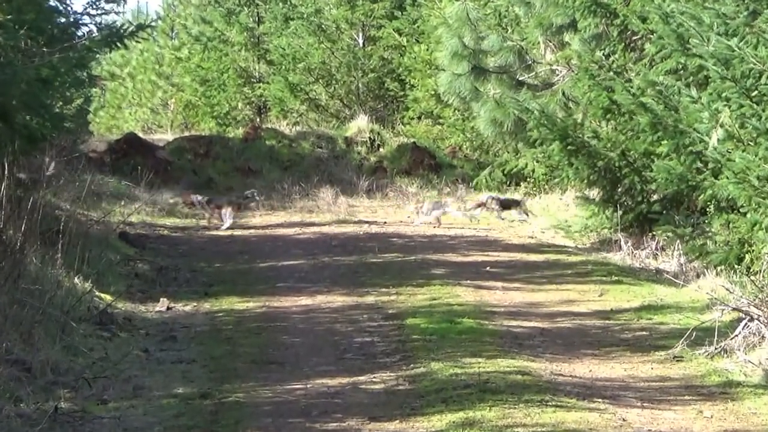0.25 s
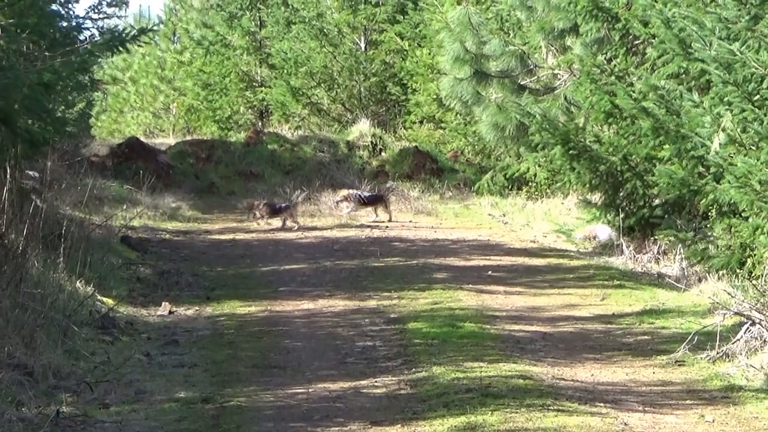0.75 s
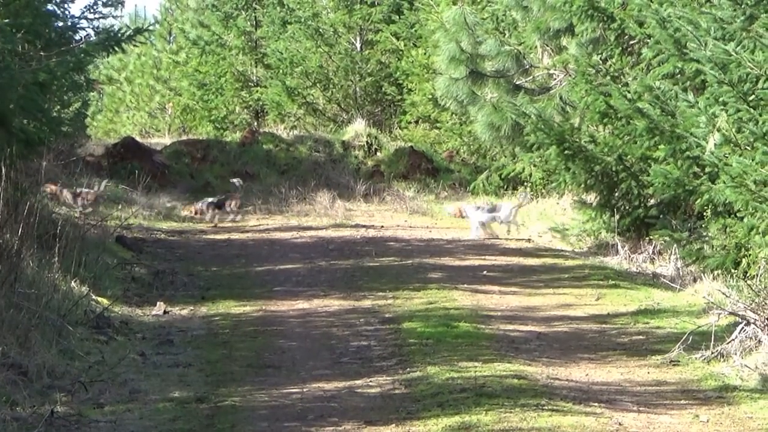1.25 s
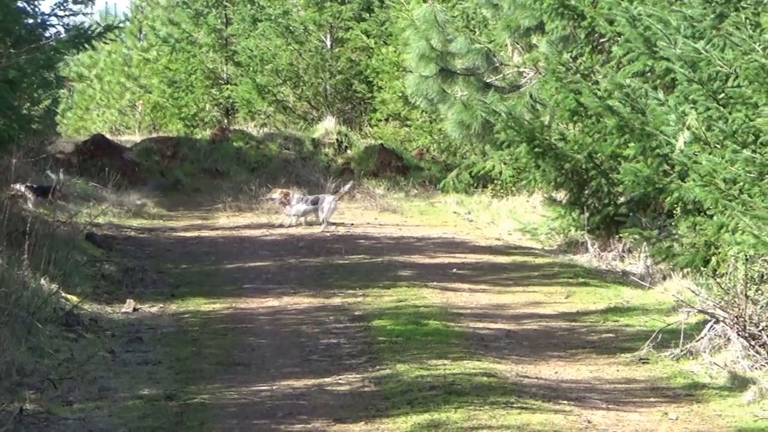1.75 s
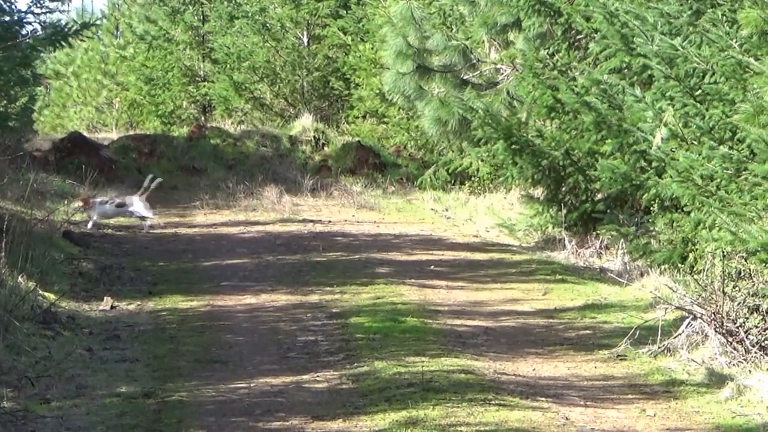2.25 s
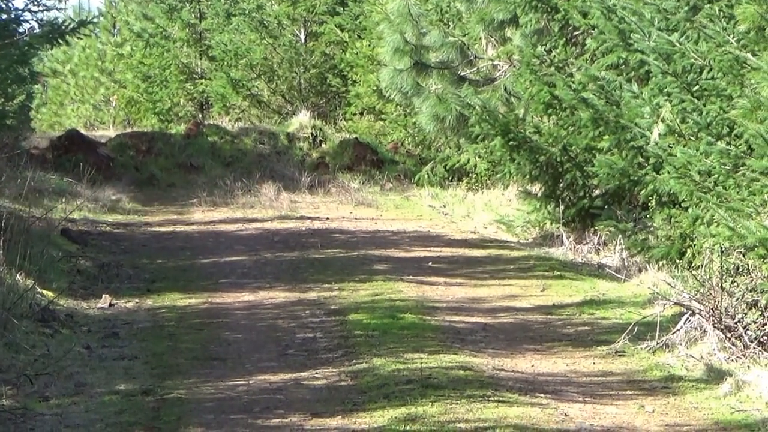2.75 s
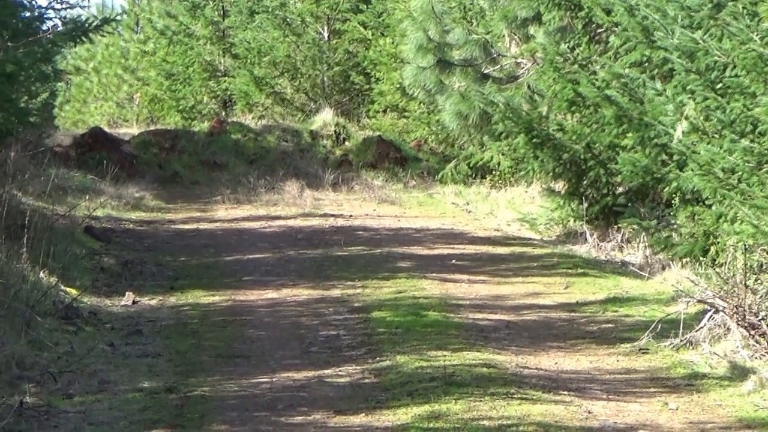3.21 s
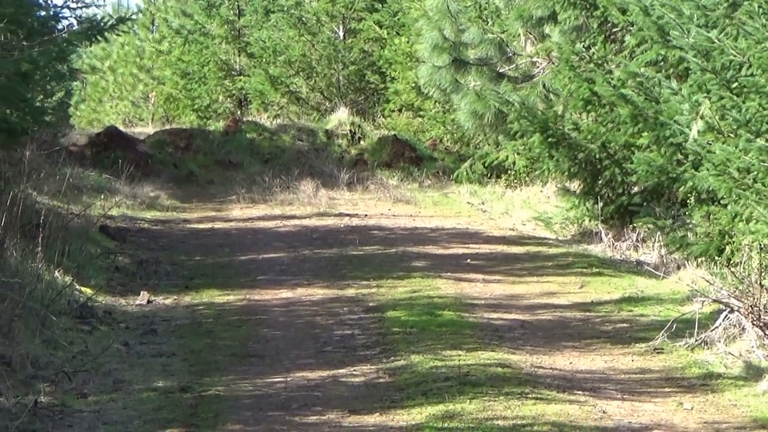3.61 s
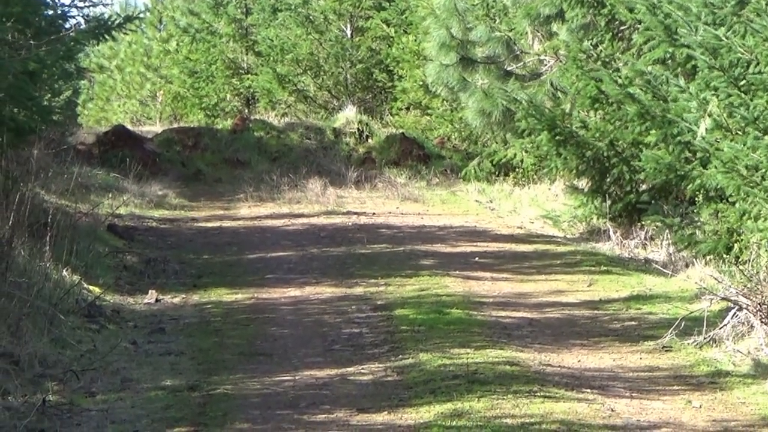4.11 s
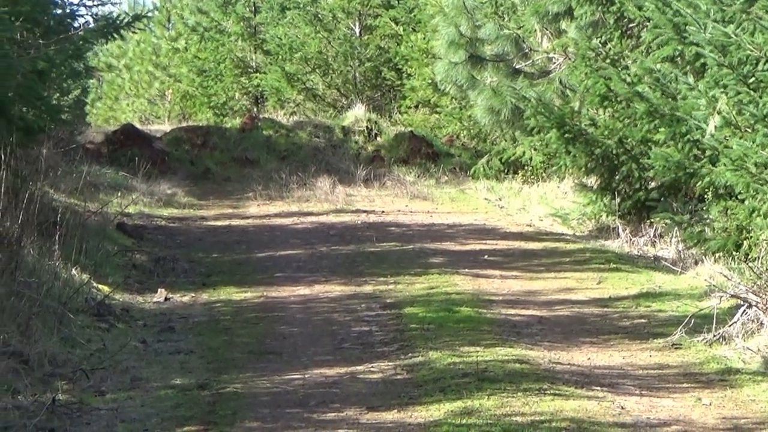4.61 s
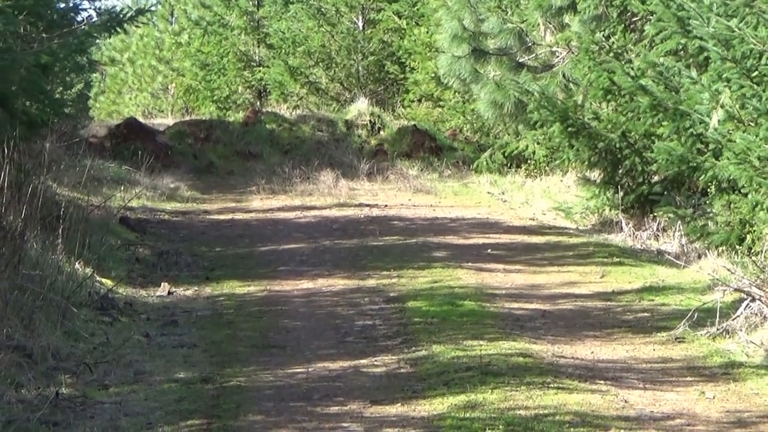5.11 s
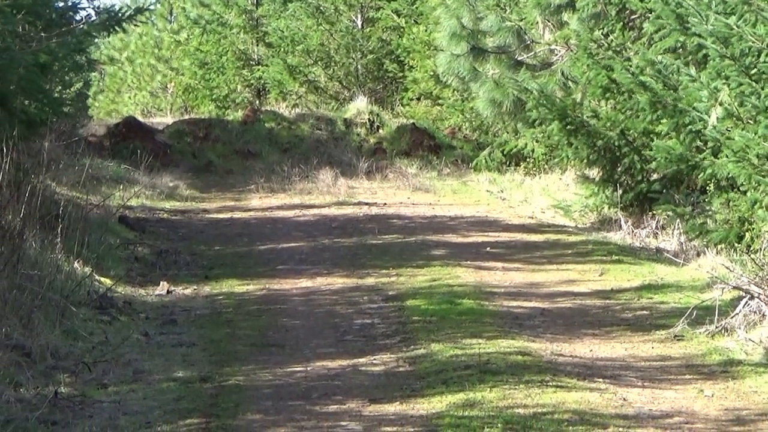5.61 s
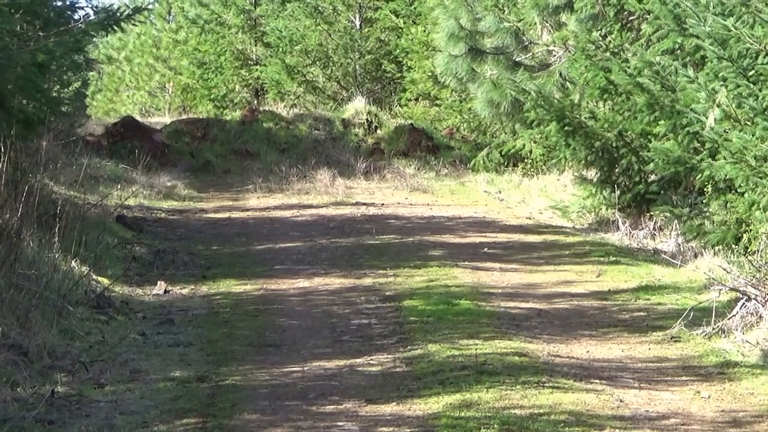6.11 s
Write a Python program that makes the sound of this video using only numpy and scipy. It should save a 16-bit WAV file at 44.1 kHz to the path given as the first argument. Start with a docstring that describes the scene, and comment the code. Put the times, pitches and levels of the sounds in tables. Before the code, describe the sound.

Hounds bay loudly close by, then the hoarse chorus of the pack carries on further off, echoing through a quiet forest.

```python
"""A few loud hound bays close by, then the hoarse chorus of the pack further off in a forest.
Each bay is a buzzing throat heard through a mouth that opens and closes. High yelps and thin howls
ring over the rest, a deep dog calls below, and twigs snap under paws. The trunks scatter every voice
into a long echo over quiet air and a faint hum. A small camera with two close microphones
holds the loudest bays down."""
import sys
import numpy as np
from scipy import signal
from scipy.fft import rfft, irfft, next_fast_len
from scipy.io import wavfile
from scipy.ndimage import uniform_filter1d, minimum_filter1d, map_coordinates

SR = 44100
rng = np.random.default_rng(int(sys.argv[2]) if len(sys.argv) > 2 else 0)


def waveform_to_disk(signal):
    """Save audio, clipped to [-1, 1], as 16-bit WAV at the path in sys.argv[1]."""
    frames = np.transpose(np.atleast_2d(signal))
    scaled = np.clip(frames, -1, 1) * 32767
    samples = np.round(scaled).astype(np.int16)
    wavfile.write(sys.argv[1], SR, samples)


N = 280476

# The close bays. Each row: start, time open and time closed in seconds, mouth ring when open and when
# closed in Hz, starting offset in dB, low overtones when open and when closed in dB, high overtones in dB,
# rise time in seconds, hiss in dB, second mouth ring in Hz, hoarseness from 0 to 1.
CLOSE_BAYS = [(-.185, 0.067, 0.097, 1000, 620, -17, -13, -13, -18.5, 0.013, -38, 2340, 0.06),
              (.1, 0.057, 0.087, 1097, 730, -16.5, -17, -13.5, -24.5, 0.02, -50, 2740, 0.24),
              (.392, 0.033, 0.052, 614, 625, -10.5, -24, -20, -31, 0.023, -56.5, 1740, 0.7),
              (.783, .062, 0.07, 1183, 890, -12.5, -7, -15, -19, .015, -46.5, 2640, 0.04),
              (1.32, 0.061, 0.098, 990, 663, -11, -12, -12, -25, .026, -49.5, 1900, 0.25)]
# The tune of each close bay, one list per bay. Each point: time in seconds, pitch in Hz.
CLOSE_TUNES = [
    [(0, 316), (.05, 287)],
    [(.1, 341.7), (.117, 361.2), (.135, 315), (.158, 322.3), (.175, 357.4), (.27, 345.5), (.31, 335)],
    [(.39, 310.3), (.5, 305.7), (.54, 297)],
    [(.783, 370.3), (.798, 380.3), (.803, 322), (.82, 336.6), (.845, 313.2), (.853, 373), (.89, 357),
     (.92, 329.8), (.945, 389), (.975, 342)],
    [(1.32, 349.4), (1.343, 299.1), (1.37, 276.2), (1.388, 286.5), (1.405, 326.6), (1.45, 302.3),
     (1.5, 292.2), (1.54, 249)],
]
# The tone of a close bay's high overtones. Each row: frequency in Hz, level in dB.
CLOSE_BRIGHTNESS = [(1300, -1), (1700, 3.5), (2100, -2.5), (2700, -7), (3100, -25), (3600, -30),
                    (6000, -78.5)]
# The breath in a close throat. Each row: frequency in Hz, level in dB.
CLOSE_HISS = [(3000, -48.5), (4600, -15), (5800, -8.5), (7100, 0.5), (9900, -6), (12100, -20),
              (14000, -29.5)]
# The hoarse middle of a hound's voice, close or far. Each row: frequency in Hz, level in dB.
RASP = [(300, -45), (800, -6), (1200, -6.5), (1500, -18), (2000, -26.5), (4000, -94.5)]
def close_bay(row, tune):
    """Throat pulses sound through a mouth that closes, so the strongest overtone steps down."""
    onset_s, hoarseness = row[9], row[12]
    start, fades, (mouth_hz, second_hz, low_db, high_db, hiss_db) = curves(*mouth_motion(*row[:-1]), .005)
    size = len(fades)
    hz = np.interp((start + np.arange(size)) / SR, *np.transpose(tune))
    gape = np.clip((mouth_hz - 620) / 300, 0, 1)
    rough = .015 + hoarseness * gape ** 2  # a wide mouth is hoarser
    phase = 2 * np.pi * np.cumsum(hz * (1 + (.003 + .4 * rough ** 2) * wobble(90, size))) / SR

    def overtone(k, noisy_share, width_hz):
        return np.sin(k * phase + rng.uniform(0, 2 * np.pi)) * roughen(noisy_share, width_hz, size)

    def brightness(f):
        return amp(along(CLOSE_BRIGHTNESS, f)) * (.51 + resonance(f, second_hz, width_hz=910))

    # The mouth rings narrowly at first, so one overtone leads.
    ring_width_hz = mouth_hz * np.interp(np.arange(size) / SR, [onset_s, onset_s + BRIGHTEN_S], [.35, .55])
    weights = np.array([resonance(k * hz, mouth_hz, ring_width_hz) ** 2 for k in range(2, 5)])
    low = np.sum(weights * [overtone(k, rough / 2, 300) for k in range(2, 5)], 0)
    low *= np.sqrt(2 / np.sum(weights ** 2, 0))
    odd_db, high_rough = -6, min(.16 + 1.5 * hoarseness, .9)  # uneven pulses: odd overtones are fainter
    high = unit(sum(brightness(k * hz) * amp(odd_db * (k % 2) + 3.5 * np.tanh(wobble(40, size)))
                    * overtone(k, high_rough, 400) for k in range(5, 12)))
    rasp = (amp(high_db - 4) + amp(low_db - 20)) * patchy(noise(RASP, size), depth_db=4)
    puffs = 1 + .7 * np.cos(phase)  # air leaves in one puff each cycle
    hiss = patchy(puffs * noise(CLOSE_HISS, size), depth_db=6.5)
    voice = amp(low_db) * low + rasp + amp(high_db) * high + amp(hiss_db) * hiss
    return place(fades * voice, start)


BRIGHTEN_S = .0072  # the high overtones reach full strength this long after the rise
def mouth_motion(s, open_s, closed_s, open_hz, closed_hz, onset_db, open_db, low_db, high_db,
                 onset_s, hiss_db, second_hz):
    """A bay rises, brightens, strains wide open, closes, holds and lets go: its times, rings and levels."""
    close_s, release_s, release_db = .015, .049, -30.5
    strain_s = max(open_s - onset_s - BRIGHTEN_S, 1e-3)
    times = s + np.cumsum([0, onset_s, BRIGHTEN_S, strain_s, close_s, closed_s, release_s])
    mouth = [open_hz] * 2 + [.98 * open_hz] * 2 + [closed_hz, .93 * closed_hz, 1.53 * closed_hz]
    second = second_hz * np.array([1, 1, 1, .935, .87, .72, .72])
    low = [open_db + onset_db, open_db, open_db - 2, low_db - 1, low_db, low_db, low_db + release_db]
    high = high_db + np.array([2 * onset_db, -2, 0, 0, -3.5, -3.5, -3.5 + release_db / 2])
    hiss = hiss_db + np.array([onset_db, onset_db / 2, onset_db / 4, 0, 0, 0, release_db])
    shut_s = np.maximum(times - times[4], 0)  # once the mouth shuts, high overtones and hiss die away
    return times, [mouth, second, low, high - 130 * shut_s, hiss - 96.5 * shut_s]


def groan(row, tune):
    """The throat's lowest note sounds briefly and sinks as a close bay lets go."""
    length_s, sinks_to, level_db = .065, .62, row[7] - 35.5
    times, _ = mouth_motion(*row[:-1])
    progress = np.arange(round(length_s * SR)) / (length_s * SR)
    hz = tune[-1][1] * sinks_to ** progress * (1 + .061 * wobble(74, len(progress)))
    voice = amp(level_db) * np.sin(np.pi * progress) * np.sin(2 * np.pi * np.cumsum(hz) / SR)
    return place(voice, round(max(times[-2], 0) * SR))


# The pack's far bays. Each row: start, swell and hold in seconds, main note and last note in Hz,
# then the levels of the note, the hoarse middle, the hoarse top and the hiss in dB.
FAR_BAYS = [(0, 0.01, 0.058, 629, 608, -50, -31, -41.5, -67),
            (0.303, 0.015, 0.03, 697, 696.5, -29, -59, -43.5, -59.5),
            (0.49, 0.032, 0.028, 607, 618.6, -34.5, -37.5, -38, -56.5),
            (0.979, 0.13, 0.097, 626, 672, -32.5, -35, -44, -63.5),
            (1.596, 0.013, 0.13, 620.7, 672, -33, -34.5, -41.5, -75),
            (1.791, 0.038, 0.036, 701.5, 703.6, -36, -36.5, -41, -59),
            (2.166, 0.012, 0.12, 638, 553.7, -26, -33.5, -44, -82),
            (2.337, 0.032, 0.11, 655, 623.6, -31, -38, -44, -76),
            (2.432, 0.092, 0.054, 665.3, 663, -40, -36, -44.5, -63),
            (2.769, 0.015, 0.1, 599.3, 551.3, -34, -33, -45, -78),
            (2.921, .1, 0.11, 654, 620, -27, -28.5, -37, -52.5),
            (3.344, 0.0097, 0.11, 627, 596.6, -35.5, -29.5, -29, -57),
            (3.494, 0.016, 0.22, 678.6, 613.8, -28, -32.5, -32.5, -55.5),
            (3.863, 0.0088, .13, 614, 565, -27, -31.5, -44, -61),
            (4.041, 0.016, 0.083, 792, 679.6, -26.5, -30, -33.5, -58),
            (4.173, 0.083, 0.072, 624, 592, -28, -31.5, -38, -56.5),
            (4.301, 0.039, 0.061, 713.3, 690.5, -20, -32.5, -30, -53.5),
            (4.475, 0.062, 0.13, 619.4, 588, -26.5, -29.5, -38, -63.5),
            (4.599, 0.0065, 0.028, 686, 698, -24, -39.5, -47, -81),
            (4.766, 0.026, 0.16, 694.3, 659, -25.5, -28.5, -33.5, -59),
            (5.132, 0.056, 0.035, 624, 631, -25, -31, -41.5, -65),
            (5.227, 0.026, 0.069, 731.5, 695, -22.5, -26.5, -32.5, -60),
            (5.395, 0.015, 0.061, 769, 702.6, -20, -26.5, -36, -63),
            (5.492, 0.0295, 0.15, 614.4, 568.7, -30.5, -33, -45, -64.5),
            (5.674, 0.056, 0.085, 659.6, 689.3, -24.5, -31.5, -33.5, -60.5),
            (5.888, 0.025, 0.085, 642, 650, -29.5, -32.5, -46, -68),
            (6.058, 0.012, 0.04, 765.4, 688.4, -24.5, -29.5, -29, -67),
            (6.15, 0.053, 0.12, 623.5, 581.7, -27, -32, -47.5, -66)]
# The hoarse top of a far voice. Each row: frequency in Hz, level in dB.
FAR_BRIGHTNESS = [(700, -68.5), (1500, -4.5), (2070, -5.5), (2630, -11), (3030, -16.5), (3430, -27.5),
                  (7000, -95)]
# The breath in the far throats. Each row: frequency in Hz, level in dB.
FAR_HISS = [(2500, -45.5), (3500, -3), (4400, -4.5), (5700, -5.5), (7000, -6.5), (9500, -12), (11500, -19),
            (14000, -54)]
def far_bay(s, swell_s, hold_s, hz, last_hz, note_db, middle_db, top_db, hiss_db):
    """One clear note leads, and the hoarse overtones and breath of the throats swell in behind it."""
    times, pitch = far_tune(s, swell_s, hold_s, hz, last_hz)
    levels = [far_levels(note_db), far_levels(middle_db, -3, -4.5),
              far_levels(top_db, -3, -8), far_levels(hiss_db, -10, 1.5)]
    start, fades, (hz, note_db, middle_db, top_db, hiss_db) = curves(times, [pitch] + levels, .014)
    size = len(hz)
    buzz = np.sqrt(.62) * throat_buzz(hz)
    breath = lambda tone, depth_db: np.sqrt(.38) * .5 * patchy(noise(tone, size), depth_db)
    rasp = lambda tone: unit(filtered(buzz, lambda f: amp(along(tone, f))) + breath(tone, 5))
    hoarse = amp(middle_db) * rasp(RASP) + amp(top_db) * rasp(FAR_BRIGHTNESS)
    hoarse += amp(hiss_db) * unit(breath(FAR_HISS, 4))
    swell = 1 - np.exp(-np.arange(size) / (.02 * SR))
    voice = amp(note_db) * far_note(hz, rough=.12, width_hz=70) + hoarse * swell
    return place(fades * voice, start)


def far_tune(s, swell_s, hold_s, hz, last_hz):
    """Times and pitches of a far bay: it slides up to its note, drifts, then lets go."""
    scoop, release_s = .94, .08
    return s + np.cumsum([0, swell_s, hold_s, release_s]), [scoop * hz, hz, last_hz, last_hz]


def far_levels(db, start_db=-9.5, held_db=-3.5):
    """A far bay's level at its start, after the swell, after the hold and at its end."""
    return db + np.array([start_db, 0, held_db, held_db - 21])


def far_note(hz, rough, width_hz):
    """The one strong tone of a far throat, wavering and a little noisy."""
    phase = 2 * np.pi * np.cumsum(hz * (1 + .015 * wobble(69.5, len(hz)))) / SR
    return np.sqrt(2) * np.sin(phase) * roughen(rough, width_hz, len(hz))


def throat_buzz(hz):
    """Wavering overtones of a far throat, which pulses an octave below its main note."""
    phase = np.pi * np.cumsum(hz * (1 + .006 * wobble(60, len(hz)))) / SR
    return unit(sum(amp(3.5 * wobble(35, len(hz))) * np.sin(k * phase + rng.uniform(0, 2 * np.pi))
                    for k in range(3, 11)))


# High yelps and thin howls, plus one ringing overtone of a close bay. Each row: start and length in
# seconds, the glide's first and last pitch in Hz, levels of the lowest, second and upper tones in dB.
HIGH_CALLS = [(0.265, 0.042, 1051, 1161, -20.5, -38.5, -44.5), (1.067, 0.19, 1356, 1313, -40.5, -40, -67),
              (1.784, 0.072, 1536, 1207, -31.5, -40, -40.5), (1.835, 0.2, 1260, 1184, -35.5, -41.5, -59),
              (2.049, 0.027, 1013, 980, -44, -36, -39.5), (2.138, 0.098, 1336, 1376, -34.5, -35.5, -84),
              (2.264, 0.067, 897, 1024, -32, -25, -65), (2.285, 0.062, 878, 823, -27, -29, -59),
              (2.465, 0.082, 996, 1270, -47, -42, -63), (2.732, 0.07, 1250, 1260, -29, -30, -60),
              (2.968, 0.0327, 1333, 1117, -26, -26, -47), (3.026, 0.161, 1267, 1206, -26.5, -50, -49),
              (3.477, 0.13, 1290, 1160, -26, -47, -57), (3.832, 0.107, 1232, 1229, -30, -41, -62),
              (4.047, 0.117, 1204, 1170, -50, -32, -78), (4.227, 0.035, 1483, 1428, -21, -44, -68),
              (4.287, 0.093, 1530, 1426, -69, -28, -52), (4.499, 0.093, 1040, 1283, -25, -56, -67),
              (4.755, 0.09, 1286, 1290, -56, -31.5, -69), (4.851, 0.053, 1334, 1298, -25, -21.5, -48),
              (5.111, 0.139, 1380, 1350, -30, -49, -74), (5.211, 0.13, 1252, 1299, -34, -34, -72),
              (5.686, 0.065, 1376, 1370, -30, -26.5, -52), (5.843, 0.11, 1579, 1133, -27.5, -39.5, -46.5),
              (6.139, 0.084, 1276, 1338, -29, -39, -69), (6.326, 0.087, 1390, 1330, -27, -32.5, -79),
              (0.212, 0.054, 1344, 1398, -28.5, -61, -68), (2.497, 0.22, 1245, 1121, -36, -44, -56),
              (3.385, 0.148, 980, 917, -32, -49, -62), (3.455, 0.086, 1560, 1308, -31, -46, -47),
              (3.621, 0.17, 1182, 1055, -29.5, -54, -65), (4.359, 0.229, 1035, 1014, -30, -59, -67),
              (5.899, 0.17, 1162, 1079, -31, -50, -62), (2.942, 0.051, 1514, 1210, -28.5, -42, -61),
              (6.047, 0.057, 1172, 1113, -45, -30.5, -74)]
def high_call(s, length_s, first_hz, last_hz, lowest_db, second_db, upper_db):
    """A thin, slightly cracked tone that starts quickly and fades."""
    size = round(length_s * SR)
    progress = np.arange(size) / (length_s * SR)
    glide_hz = last_hz + (first_hz - last_hz) * (1 - progress) ** 1.293
    scoop = .053 * np.exp(-progress * length_s / .01316)  # starts under the glide
    hz = glide_hz * (1 - scoop - .04 * progress ** 2)  # and sags at the end
    phase = 2 * np.pi * np.cumsum(hz * (1 + .006 * wobble(80, size))) / SR
    voice = np.zeros(size)
    for k, db in enumerate([lowest_db, second_db, upper_db, upper_db - 6.5]):
        crack = .9 / (1 + k * k / 2) + .45 * smear(150 + 80 * k * k, size)  # higher tones are noisier
        voice += amp(db) * crack * np.sin((k + 1) * phase)
    shape = np.minimum(progress * length_s / .012, 1) * (1 - progress) ** .8
    return place(np.sqrt(2) * shape * voice, round(s * SR))


# The deep-voiced dog. Each row: start, swell and hold in seconds, main and last note in Hz, level in dB.
DEEP_BAYS = [(1, 0.034, 0.14, 502.4, 560, -37), (2.9, 0.085, 0.13, 490, 515, -44.5),
             (3.498, 0.18, 0.066, 544.5, 528, -33.5), (4.101, 0.22, 0.13, 514, 508, -35.5),
             (4.817, 0.022, 0.101, 534, 488.5, -33), (5.3, 0.087, 0.31, 511, 526.4, -34.5),
             (6.083, 0.021, 0.19, 525, 517, -35)]
def deep_bay(s, swell_s, hold_s, hz, last_hz, db):
    """One low, rough tone makes a dull bay under the chorus."""
    times, pitch = far_tune(s, swell_s, hold_s, hz, last_hz)
    start, fades, (hz, db) = curves(times, [pitch, far_levels(db)], .013)
    return place(fades * amp(db) * far_note(hz, rough=.51, width_hz=71), start)


# Breaking twigs. Each row: start in seconds, level in dB before the low sounds are filtered out.
TWIG_SNAPS = [(0.548, -39), (2.593, -40)]
def twigs():
    """Dry twigs snap under the paws, each a tiny burst of bright noise."""
    snaps, t = np.zeros(N), np.arange(SR // 50) / SR
    for s, db in TWIG_SNAPS:
        shape = amp(db - 60 * t / .03) * np.minimum(t / .002, 1)
        snaps += place(shape * rng.standard_normal(len(t)), round(s * SR))
    return filtered(snaps, lambda hz: resonance(hz, 9000, 5000) ** 2)


# How long the forest rings. Each row: frequency in Hz, seconds to fade by 60 dB.
ECHO_TIMES = [(400, 0.27), (700, 0.95), (1500, 1), (3000, 0.51), (9000, 0.051)]
def tree_echoes(voice, side_db, blur_hz):
    """Trunks scatter a voice, each frequency dying at its own speed; side_db sets the stereo width."""
    hz, t, spectrum = signal.stft(rng.standard_normal((2, SR)), SR, nperseg=256)
    decay = amp(-60 * t / along(ECHO_TIMES, hz)[:, None])
    mid, side = signal.istft(spectrum * decay, SR, nperseg=256)[1]
    tail = np.array([mid + amp(side_db) * side, mid - amp(side_db) * side]) / np.linalg.norm(mid)
    blurred = voice * smear(blur_hz, N)  # running dogs and swaying treetops blur the echoes' pitch
    delayed = np.pad(blurred, (500, 0))
    return signal.fftconvolve(delayed[None], tail, axes=1)[:, :N]


# The tone of the still forest. Each row: frequency in Hz, level in dB.
AIR_TONE = [(20, -9.5), (45, 2.5), (95, -3), (150, -1), (350, -8), (3000, -14.5), (8000, -21), (15800, -28)]
# How alike the air sounds left and right. Each row: frequency in Hz, likeness from 0 to 1.
AIR_LIKENESS = [(30, 0), (80, .1), (150, .4), (300, .8), (4000, .7), (7500, .98)]
def forest_air():
    """A soft hush whose low sounds differ at the two microphones."""
    def response(hz):
        angle = np.arccos(np.clip(along(AIR_LIKENESS, hz), -1, 1)) / 2
        return amp(along(AIR_TONE, hz)) * [np.cos(angle), np.sin(angle)]

    mid, side = filtered(rng.standard_normal((2, N)), response)
    return amp(-55.5) * unit(np.array([mid + side, mid - side]))


# The tones of a faint hum. Each row: pitch in Hz, typical level in dB.
HUM_TONES = [(92, -63.5), (209, -70)]
def hum():
    """Two low tones waver in loudness and pitch."""
    return sum(amp(db + 7.6 * wobble(60, N))
               * np.sin(2 * np.pi * hz * np.cumsum(1 + .014 * wobble(29, N)) / SR) for hz, db in HUM_TONES)


def amp(db):
    """Turn decibels into a gain."""
    return 10 ** (np.asarray(db) / 20)


def unit(x):
    """Scale a sound to an average power of 1."""
    return x / np.sqrt(np.mean(x ** 2) + 1e-20)


def place(x, start):
    """Put a sound into silence, beginning at sample number start."""
    return np.pad(x, (start, N))[:N]


def along(points, hz):
    """Read between a table's (Hz, value) rows, with octaves evenly spaced."""
    f, values = np.transpose(points)
    return np.interp(np.log(hz + 1), np.log(f + 1), values)


def curves(times, columns, fade_s):
    """A call's first sample, its fade in and out, and each column drawn out to one value per sample."""
    first = max(0, round(times[0] * SR))
    t = np.arange(first, min(N, round(times[-1] * SR))) / SR
    fades = np.clip(np.minimum(t - t[0], t[-1] - t) / fade_s, 0, 1)
    return first, fades, [np.interp(t, times, column) for column in columns]


def wobble(rate, size):
    """A smooth curve through rate random points a second."""
    return map_coordinates(rng.standard_normal(int(size * rate / SR) + 4), [np.arange(size) * rate / SR])


def resonance(hz, centre_hz, width_hz):
    """A gain of 1 at the centre that falls away on both sides."""
    return 1 / (1 + (2 * (hz - centre_hz) / width_hz) ** 2)


def filtered(x, response):
    """Scale each frequency in x by response(hz)."""
    size = next_fast_len(x.shape[-1] + 8192)
    return irfft(rfft(x, size) * response(np.fft.rfftfreq(size, 1 / SR)), size)[..., :x.shape[-1]]


def noise(tone, size):
    """Noise shaped by a table of (Hz, dB) rows."""
    return unit(filtered(rng.standard_normal(size), lambda hz: amp(along(tone, hz))))


def smear(width_hz, size):
    """Slow noise: a tone multiplied by it spreads into a narrow band."""
    return unit(filtered(rng.standard_normal(size), lambda f: resonance(f, 0, width_hz) ** 2))


def roughen(share, width_hz, size):
    """A fluttering gain that turns a share of a tone's power into noise."""
    return np.sqrt(1 - share) + np.sqrt(share) * smear(width_hz, size)


def patchy(x, depth_db):
    """Short louder and softer streaks, as when many throats come and go."""
    spectrum = signal.stft(x, nperseg=1024, noverlap=768)[2]
    streaks = uniform_filter1d(rng.standard_normal(spectrum.shape), size=3, axis=0)
    streaks = unit(uniform_filter1d(streaks, size=7, axis=1))
    return unit(signal.istft(spectrum * amp(depth_db * streaks), nperseg=1024, noverlap=768)[1][:len(x)])


def scene():
    """Dogs, twigs, air and echoes, mixed into left and right."""
    close = sum(close_bay(row, tune) + groan(row, tune) for row, tune in zip(CLOSE_BAYS, CLOSE_TUNES))
    pack = sum(far_bay(*row) for row in FAR_BAYS) + sum(deep_bay(*row) for row in DEEP_BAYS)
    high = sum(high_call(*row) for row in HIGH_CALLS)
    dogs = close * amp([[-.6], [.6]]) + pack * amp([[-2], [-2.9]]) + high * amp([[-1.7], [-2.5]])
    close_echo = amp(-21.5) * tree_echoes(close, side_db=-5, blur_hz=200)
    forest = twigs() + forest_air() + [hum(), hum()]
    pack_echo = amp(-10) * tree_echoes(pack, side_db=-13, blur_hz=198)
    high_echo = amp(-13.5) * tree_echoes(high, side_db=-8.5, blur_hz=220)
    return dogs + forest + close_echo + pack_echo + high_echo


# The camera's two microphones. Each row: frequency in Hz, how much louder the left one is in dB.
MIC_BALANCE = [(600, -0.5), (1300, 0.2), (2500, 3), (5000, 1.7), (9000, 0.1)]
def record(dry):
    """The camera turns the loudest moments down and cuts off the very highest sounds."""
    ceiling, top_hz = .6, 15710
    needed_gain = np.minimum(1, ceiling / (np.abs(dry).max(0) + 1e-9))
    gain = uniform_filter1d(minimum_filter1d(needed_gain, size=881), size=441)
    return filtered(dry * gain, lambda hz: amp(along(MIC_BALANCE, hz) * [[.5], [-.5]]) * (hz < top_hz))


dry = scene()
out = record(dry)
waveform_to_disk(out)
```